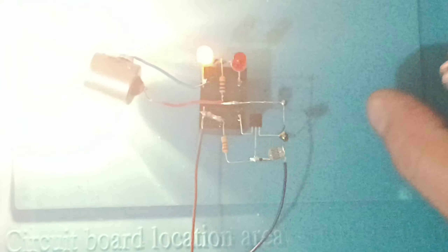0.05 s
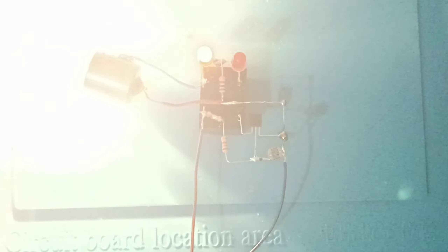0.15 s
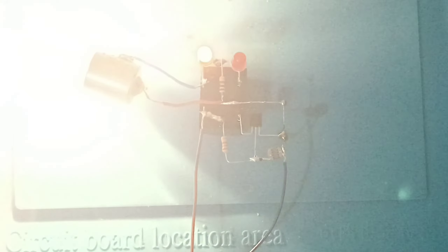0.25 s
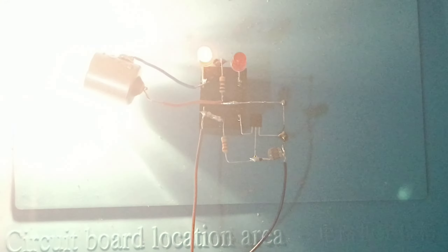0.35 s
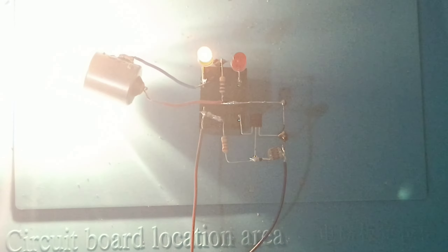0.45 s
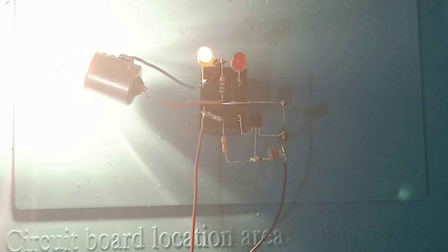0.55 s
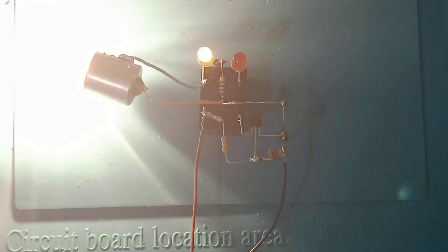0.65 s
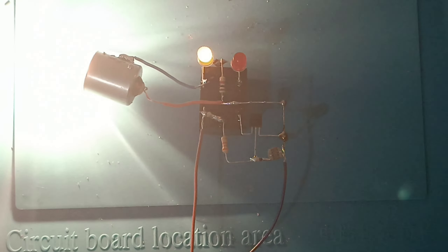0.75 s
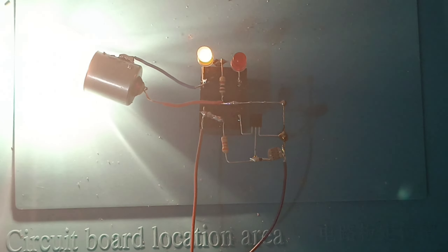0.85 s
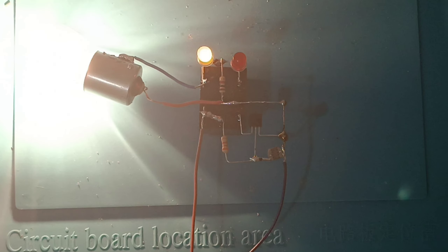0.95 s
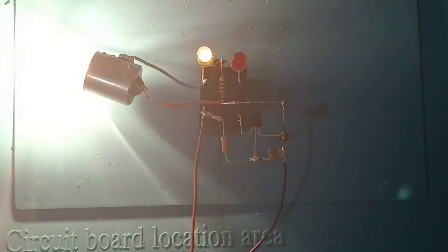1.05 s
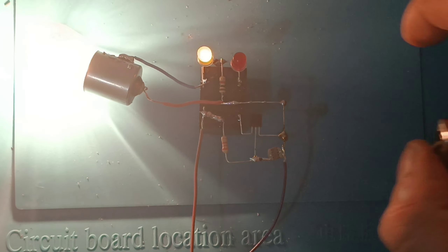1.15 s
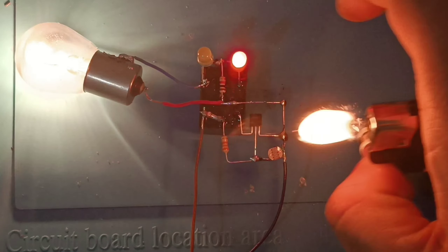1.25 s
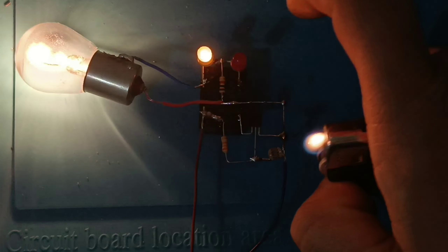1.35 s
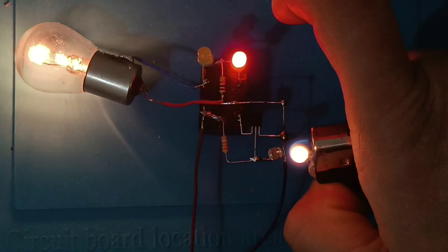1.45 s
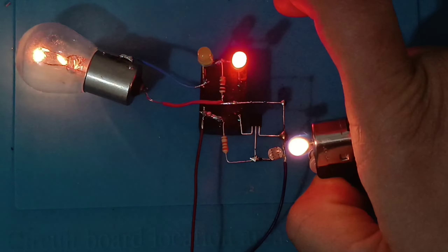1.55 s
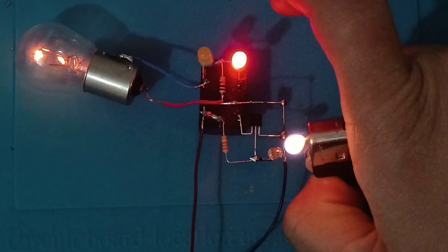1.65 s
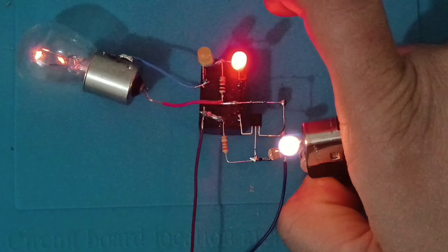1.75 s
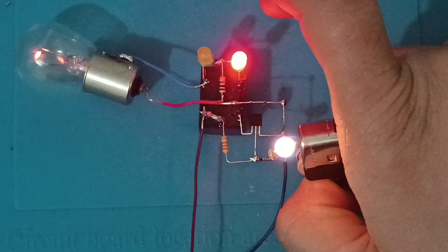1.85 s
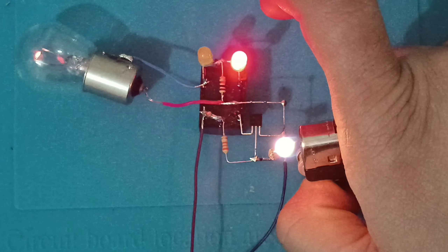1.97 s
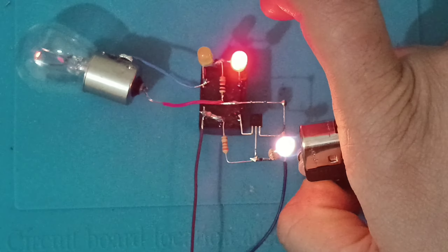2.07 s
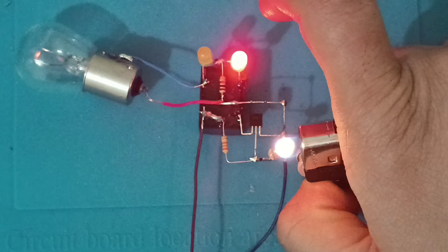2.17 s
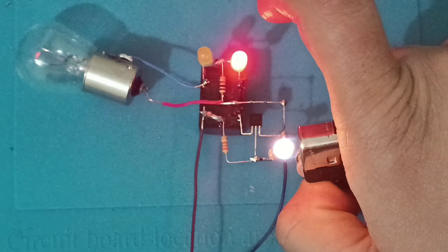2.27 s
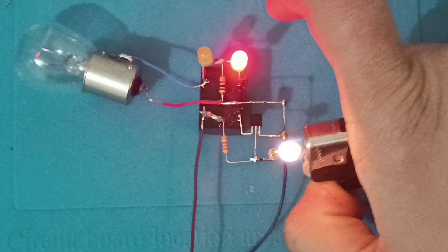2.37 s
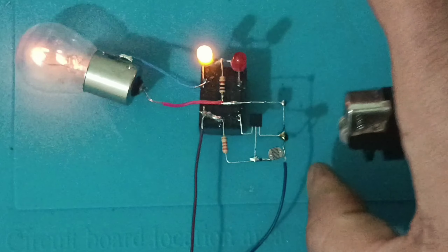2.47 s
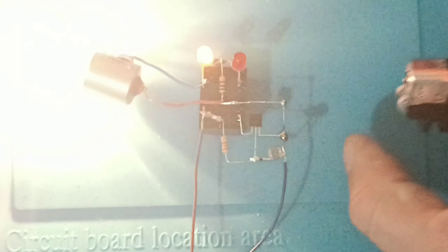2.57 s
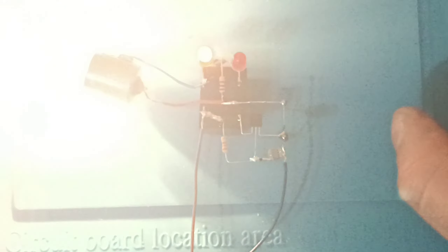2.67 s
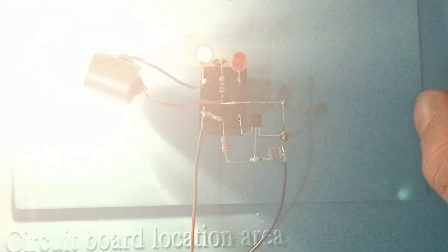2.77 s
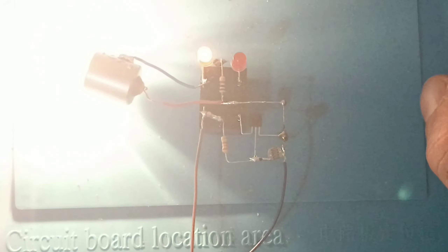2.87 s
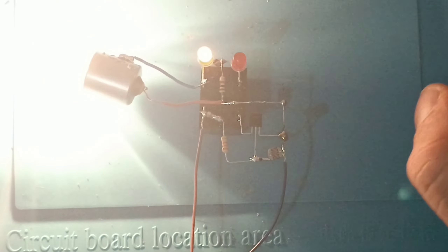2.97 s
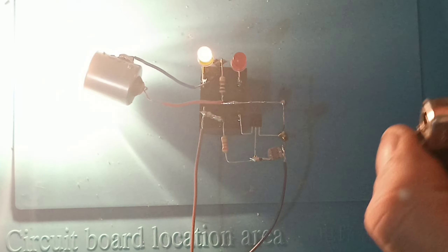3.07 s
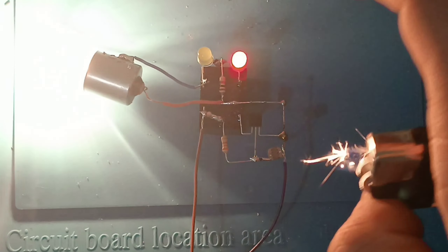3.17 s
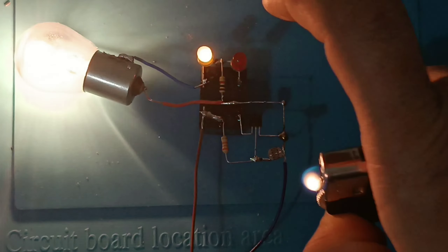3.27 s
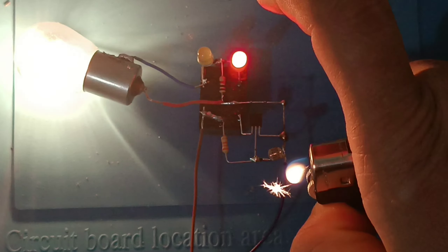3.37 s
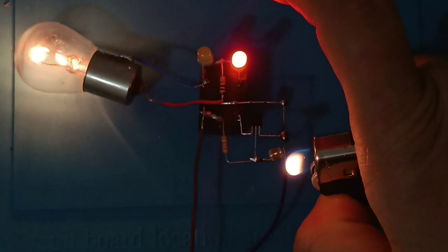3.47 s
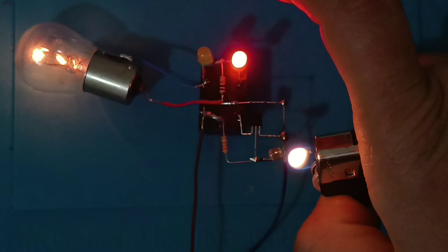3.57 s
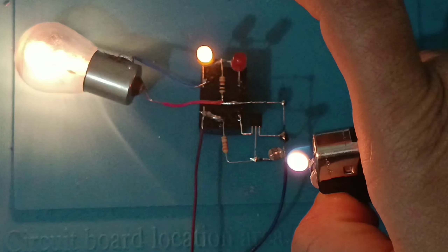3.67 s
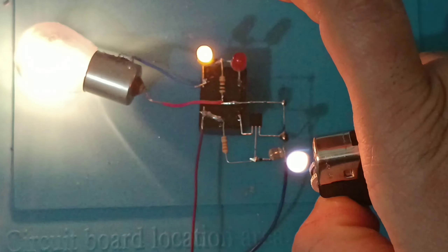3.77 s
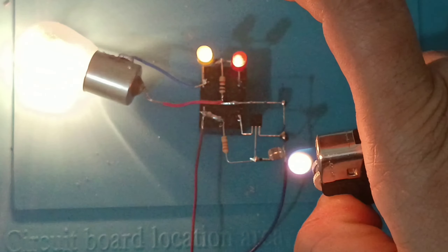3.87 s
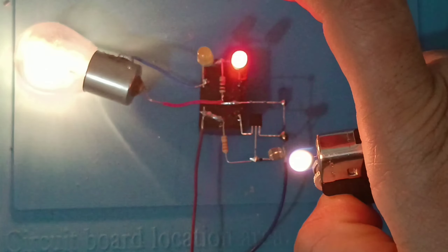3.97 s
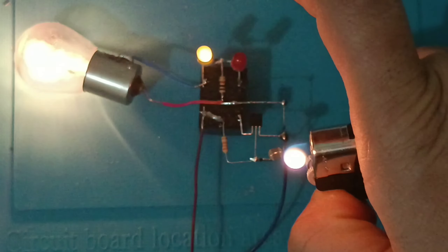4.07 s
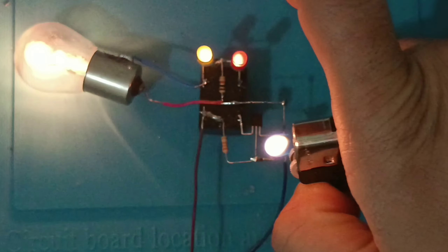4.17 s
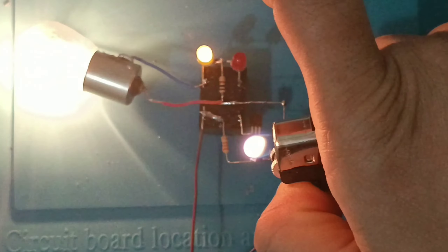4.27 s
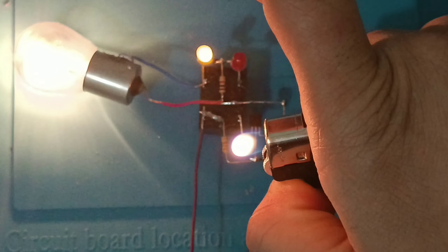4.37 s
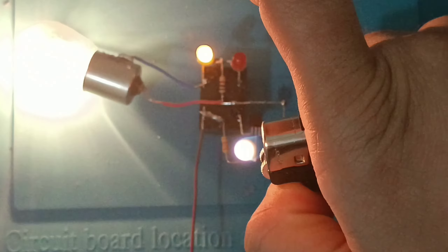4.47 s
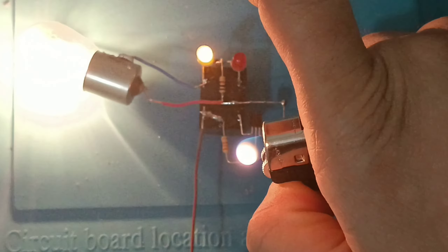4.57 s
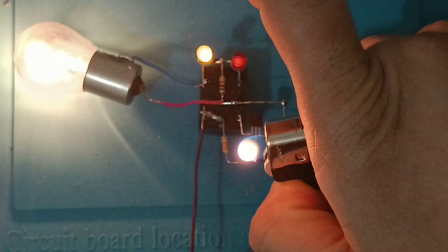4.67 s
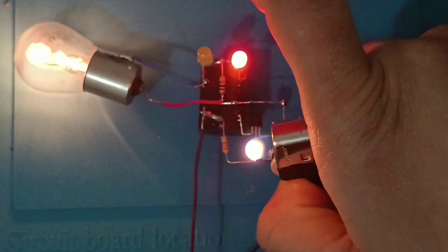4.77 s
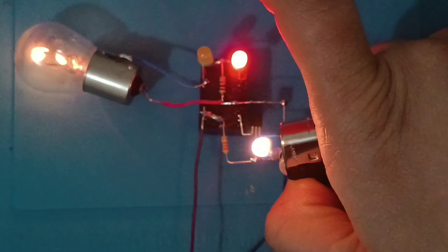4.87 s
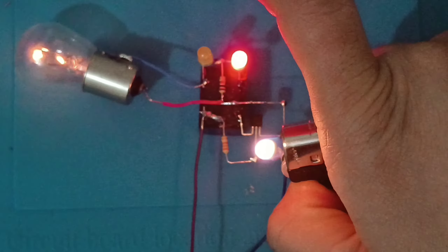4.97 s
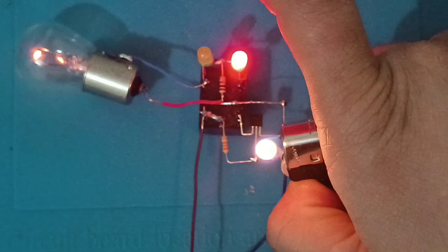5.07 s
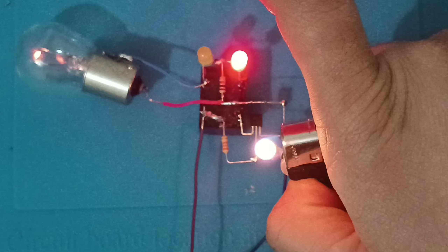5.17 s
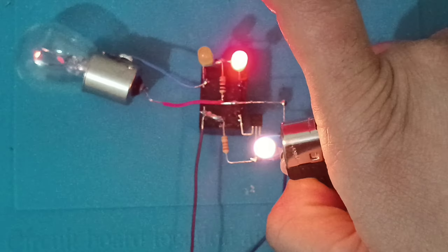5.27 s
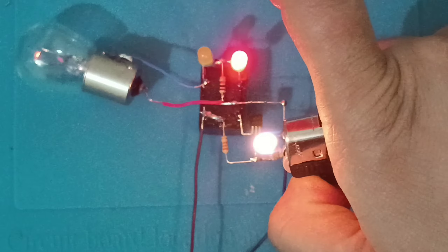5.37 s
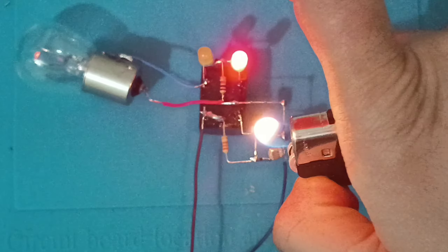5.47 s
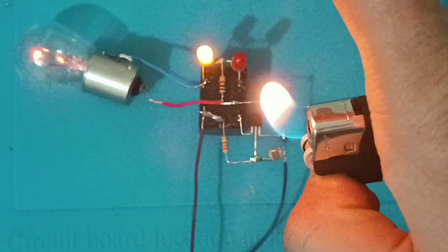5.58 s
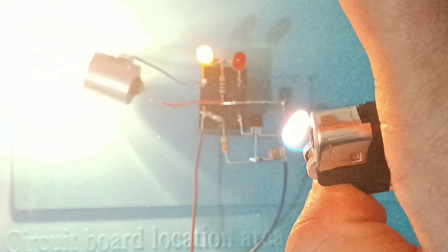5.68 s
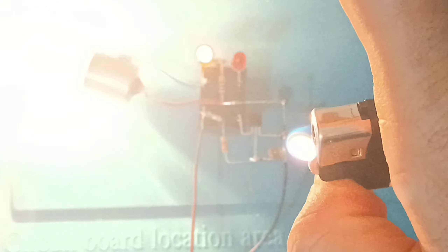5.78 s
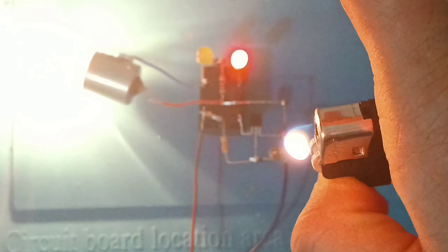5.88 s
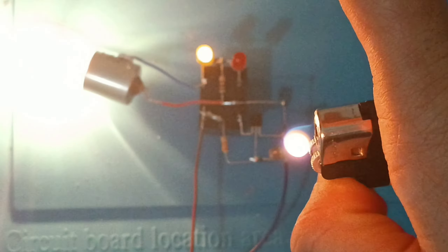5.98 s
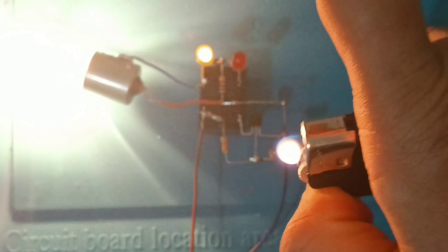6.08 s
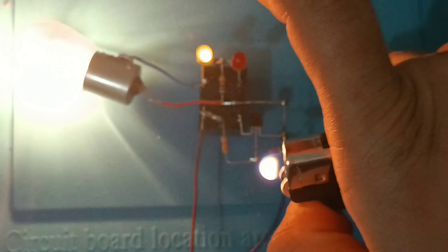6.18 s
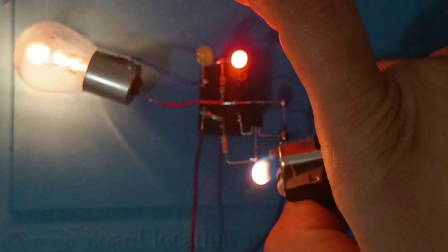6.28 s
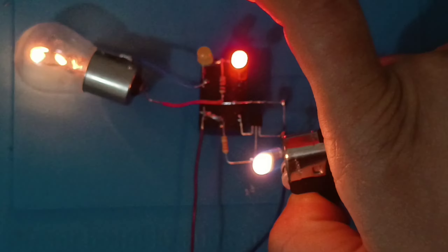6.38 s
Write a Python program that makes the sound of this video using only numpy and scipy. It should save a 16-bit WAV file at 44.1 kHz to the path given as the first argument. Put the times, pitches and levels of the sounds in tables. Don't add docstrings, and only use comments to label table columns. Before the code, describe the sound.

Very close on a hobby table in a small room: faint ticks, then a lighter strike, a sharp gritty rasp with a heavy lever thump, and a few small relay clicks. A second strike follows, lighter, then a firm relay snap and nearly a second of uneven rattling chatter. After a pause the relay closes again and chatters to the end. Soft hiss and low hand rumble lie underneath, picked up by a phone's stereo microphones.

```python
import sys
import numpy as np
from scipy import signal
from scipy.fft import rfft, irfft, next_fast_len
from scipy.io import wavfile
from scipy.ndimage import uniform_filter1d

SR = 44100
rng = np.random.default_rng(int(sys.argv[2]) if len(sys.argv) > 2 else 0)


def store_pcm(level_fs):
    pcm = np.round(np.clip(level_fs, -1, 1) * 32767).astype(np.int16)
    wavfile.write(sys.argv[1], SR, np.atleast_2d(pcm).T)


def nominal_scale(level):
    x = np.asarray(level, float) / 20
    return 10 ** x


N = 283563
T = np.arange(N) / SR

# (centre [Hz], width [Hz], level [dB])
TABLE_MODES = [(105, 30, -5), (139.4, 26, -3), (158.3, 3.9, 2.5), (185.3, 4, 5), (217.5, 11.6, 1.5),
               (297.3, 15, 0.5), (340, 7.2, -2), (374, 38, -6.5), (778, 107, -21.5)]


def unit(x):
    return x / np.sqrt(np.mean(x ** 2) + 1e-20)


def along(points, hz):
    f, v = np.transpose(points)
    return np.interp(np.log(hz + 1), np.log(f + 1), v)


def filtered(x, response):
    m = next_fast_len(N + SR // 2)
    return irfft(rfft(x, m) * response(np.fft.rfftfreq(m, 1 / SR)), m)[..., :N]


def modes(table, f, flip=-1):
    total = 0
    for k, (centre, width, db) in enumerate(table):
        damping = 1j * f * width
        total = total + flip ** k * nominal_scale(db) * damping / (centre * centre - f * f + damping)
    return total


def struck(x, gain):
    cep = irfft(np.log(gain(np.fft.rfftfreq(4096, 1 / SR)) + 1e-6))
    cep[1:2048] *= 2
    cep[2049:] = 0
    h = irfft(np.exp(rfft(cep)))
    return signal.fftconvolve(x, h / np.linalg.norm(h))[:N]


def treble(x, edge_hz):
    return filtered(x, lambda f: (1j * f / edge_hz) ** 2 / (1 + 1j * f / edge_hz) ** 2)


def stroke(s, db, hold, rise, fall):
    before = np.clip(s - T, 0, None)
    after = np.clip(T - s - hold, 0, None)
    return nominal_scale(db - rise * before - fall * after)


def grains(share, spread_db):
    sizes = nominal_scale(spread_db * rng.standard_normal(N))
    return unit(rng.standard_normal(N) * sizes * (rng.random(N) < share))


def spikes(s, size):
    return np.bincount(np.clip(np.round(s * SR).astype(int), 0, N - 1), size, N)


def space(x, near_s, room_db, direct_db):
    # (frequency [Hz], time to fall 60 dB [s])
    room_t60 = [(150, 0.64), (500, 0.75), (2000, 0.39), (8000, 0.29), (15000, 0.17)]
    lag = 6
    out, hop = np.zeros((2, N + SR)), SR // 3
    for k in range(0, N, hop):
        hz, t, z = signal.stft(rng.standard_normal((2, SR * 2 // 5)), SR, nperseg=256)
        decay = nominal_scale(-60 * t / along(room_t60, hz)[:, None])
        tail = signal.istft(z * decay, SR, nperseg=256)[1]
        near = rng.standard_normal(tail.shape) * nominal_scale(-60 * T[:tail.shape[1]] / near_s)
        near -= uniform_filter1d(near, size=40)
        h = near / np.linalg.norm(near[0]) + nominal_scale(room_db) * tail / np.linalg.norm(tail[0])
        h[[0, 1], [0, lag]] += nominal_scale(direct_db + np.array([2, -2]))
        wet = signal.fftconvolve(x[None, k:k + hop], h, axes=1)
        out[:, k:k + wet.shape[1]] += wet
    return out[:, :N]


def port_hiss():
    # (frequency [Hz], density [dB per Hz])
    air_colour = [(15, -54.5), (25, -24), (53, 2), (119, -1), (209, -5.5), (304, -10), (550, -15),
                  (780, -19.5), (1370, -19.5), (2610, -22), (6340, -36), (9500, -41), (13000, -40),
                  (15500, -35)]
    hiss = unit(filtered(rng.standard_normal((2, N)), lambda f: nominal_scale(along(air_colour, f))))
    return nominal_scale(-60.5) * hiss * nominal_scale([[.6], [-.6]])


def far_ring():
    # (time [s], level [dB], rise [dB per s], fall [dB per s])
    swell = (2.67, -71, 200, 17)
    s, db, rise, fall = swell
    return np.sin(2 * np.pi * 588 * T) * stroke(s, db, 0, rise, fall)


def hand_on_table():
    # (time [s], level [dB], hold [s])
    presses = [
        (0, -60.5, .01),
        (0.435, -60.5, 0.15),
        (1.36, -46.5, 0.13),
        (2.74, -66.5, .01),
        (3.42, -51, .01),
        (3.898, -55.5, 0.82),
        (5.88, -67, .05),
        (6.16, -59.5, .3),
    ]
    # (time [s], level [dB], half length [s], pitch [Hz])
    shifts = [
        (0.12, -60, 0.033, 105),
        (0.586, -55.5, 0.056, 110),
        (2.6, -59, 0.043, 120),
        (3.508, -63, 0.09, 98),
        (3.751, -54.5, 0.059, 157),
        (4.31, -63.5, 0.14, 120),
        (4.845, -54.5, 0.091, 132),
        (5.741, -58.5, 0.062, 244),
        (3.324, -48.5, 0.054, 112),
        (6.42, -56, 0.034, 120),
    ]
    rest_db, rise, fall = -77, 120, 75
    lumps = nominal_scale(3.5 * unit(uniform_filter1d(rng.standard_normal(N), 1500)))
    press = nominal_scale(rest_db) + sum(stroke(*row, rise, fall) for row in presses)
    rumble = filtered(rng.standard_normal(N), lambda f: modes(TABLE_MODES, f))
    hand = nominal_scale(-5.0) * press * unit(lumps * rumble)
    for s, db, half, hz in shifts:
        groan = unit(filtered(rng.standard_normal(N), lambda f: modes([(hz, 45, 0)], f) ** 2))
        hand += nominal_scale(db) * np.exp(-((T - s) / half) ** 2) * groan
    return hand


def sleeve():
    # (time [s], level [dB])
    brushes = [
        (.42, -74),
        (.57, -66.5),
        (1.06, -64.5),
        (2.72, -70),
    ]
    # (frequency [Hz], density [dB per Hz])
    skin_colour = [(300, -24.5), (800, -2.5), (1800, 5), (3000, -9), (5500, -9), (9000, -16.5),
                   (15000, -27)]
    swell = sum(stroke(s, db, 0, 430, 130) for s, db in brushes)
    return swell * unit(filtered(rng.standard_normal((2, N)), lambda f: nominal_scale(along(skin_colour, f))))


def background():
    return port_hiss() + hand_on_table() + sleeve() + far_ring()


def flint_wheel(bites):
    # (frequency [Hz], density [dB per Hz])
    wheel_colour = [(350, -30), (600, -8.5), (1220, -15.5), (2460, -2.5), (2780, -3), (3190, -2),
                    (4200, -6), (5640, -6.5), (6640, -13), (15400, -14.5)]
    bite, spin_out = 0, 0
    for s, db, tooth, spin in bites:
        for late, under_db in ((0, 0), (tooth, -3.5)):
            bite = bite + stroke(s + late, db + under_db, 0, 2630, 2400)
        spin_out = spin_out + stroke(s, db - 11.5, tooth, 960, 180) * (T < s + spin)
    grit = nominal_scale(-3) * grains(.3, 4.7) * (bite + spin_out)
    return struck(grit, lambda f: nominal_scale(along(wheel_colour, f)))


def lever_slide():
    # (time [s], level [dB], hold [s])
    slides = [
        (0, -62, 0.028),
        (2.499, -56, 0.023),
    ]
    # (centre [Hz], width [Hz], level [dB])
    lever_modes = [(1560, 710, -13), (3230, 195, 0.5), (4370, 660, -14.5), (10000, 3000, -27)]
    squeak = unit(filtered(grains(.1, 3), lambda f: modes(lever_modes, f)))
    return squeak * sum(stroke(*row, 4500, 1500) for row in slides)


def lighter_ticks():
    # (time [s], peak [dB], ring [Hz], crack [dB])
    knocks = [
        (.0078, -39.5, 3200, -16),
        (.026, -40, 3420, -14),
        (1.3241, -17, 3470, -1),
        (1.333, -28, 3560, 0),
        (3.2597, -20, 3480, -0.5),
        (3.272, -30.5, 3350, -2),
        (3.2955, -32, 2650, 4),
    ]
    t = T[:SR // 20]
    ticks = np.zeros(N + SR)
    for s, db, hz, crack_db in knocks:
        ring = np.sin(2 * np.pi * hz * t) * nominal_scale(-60 * t / 0.011)
        crack = rng.standard_normal(len(t)) * nominal_scale(crack_db - 60 * t / 0.0027)
        ticks[round(s * SR):][:len(t)] += nominal_scale(db) * (ring + crack)
    return ticks[:N]


def lever_thumps():
    # (time [s], level [dB], push [Hz])
    pushes = [
        (1.3573, -18.5, 238),
        (1.362, -21, 174),
        (3.286, -31, 265),
        (3.2894, -36, 330),
        (3.2924, -26.5, 257),
        (3.297, -37, 220),
    ]
    t = T[:SR // 20]
    thumps = np.zeros(N + SR)
    for s, db, hz in pushes:
        push = np.sin(2 * np.pi * hz * t) + .14 * np.sin(6 * np.pi * hz * t)
        one_cycle = (t * hz < 1) * np.sin(np.pi * hz * t)
        thumps[round(s * SR):][:len(t)] -= nominal_scale(db) * push * one_cycle
    thumps = thumps[:N]
    boom = lambda f: modes(TABLE_MODES, f) * np.exp(-2j * np.pi * f * 0.01508)
    return thumps + nominal_scale(-0.5) * filtered(thumps, boom)


def body_jolt(bites):
    jolt = 0
    for s, db, *_ in bites:
        jolt = jolt + np.sin(2 * np.pi * 317 * (T - s)) * stroke(s, db - 2.5, 0, 6200, 6200)
    return jolt


def lighter():
    # (time [s], level [dB], next tooth after [s], spin-out [s])
    bites = [
        (1.3248, -28.5, 0.0089, .046),
        (3.2605, -30, .012, .039),
    ]
    air = lever_slide() + flint_wheel(bites) + nominal_scale(-6) * lighter_ticks()
    return space(air, 0.0053, -3, 3.85), body_jolt(bites) + lever_thumps()


def taps(bursts, span, rate, scatter, spread_db, fade_db):
    s, db, bright_db, shake_db = np.transpose(bursts)[:, :, None]
    span = np.reshape(span, (-1, 1))
    chance = rng.standard_normal((len(bursts), 48, 2))
    late = np.cumsum(np.exp(scatter * chance[..., 0]), axis=1) / rate
    late -= late[:, :1]
    chance[:, 0, 1] = 0.58
    alive = 1 / (1 + np.exp(np.clip((late - span) / .0012, -30, 30)))
    size = alive * nominal_scale(db + spread_db * chance[..., 1] - fade_db * late / span)
    when = (s + late).ravel()
    return np.array([spikes(when, (size * nominal_scale(g)).ravel()) for g in (0, bright_db, shake_db)])


def armature():
    # (time [s], peak [dB], bright part [dB], table shake [dB])
    snaps = [(.0468, -45.5, -5, -16), (.0508, -46, 3, -6), (.0572, -34, -8.5, -12.5), (.0665, -54, -18, 0),
             (1.3938, -32.5, -16, -24), (1.4512, -42, -5, -27), (1.498, -52, -12, -21),
             (1.5034, -44, -18, -7), (1.595, -55.5, -16, -16), (2.5403, -48, -4, -5),
             (2.5443, -41.5, -5, -10), (2.5515, -34.5, -12, -12), (2.561, -51, -10, -14),
             (3.354, -44, -5, -32), (3.3607, -31.5, -6, -32), (5.7235, -34, -16, -14)]
    # (time [s], peak [dB], bright part [dB], table shake [dB])
    closings = [
        (3.45, -24.5, -21, -17.5),
        (5.6772, -44, -38, -22.5),
        (5.6767, -37.5, -28, -7.5),
        (5.9712, -27, -26, -14.5),
    ]
    # (time [s], peak [dB], bright part [dB], length [s])
    chatter = [(3.6845, -38.5, -10, .085), (3.806, -40, -14.5, .011), (3.8637, -39.5, -12.5, 0.0093),
               (3.948, -41, -10.5, 0.013), (3.984, -38.5, -17, 0.015), (4.024, -38.5, -10.5, 0.01),
               (4.05, -48.5, -11, 0.022), (4.1104, -42.5, -12, 0.033), (4.1558, -38, -15, 0.018),
               (4.1787, -48, -12, 0.049), (4.277, -43.5, -12, 0.095), (4.387, -39.5, -17, 0.02),
               (4.444, -43.5, -12, 0.061), (4.4985, -40.5, -16, 0.059), (4.587, -50.5, -12, 0.031),
               (4.625, -43, -14, 0.067), (4.7003, -42, -17, .11), (4.8008, -40.5, -22, 0.074),
               (5.687, -35, -28, .021), (5.9974, -51, -22, 0.061), (6.0214, -37, -11, .0098),
               (6.0668, -56, 4.5, 0.017), (6.084, -42, -9, 0.028), (6.1405, -43.5, -8.5, 0.052),
               (6.2135, -43, -8, 0.093), (6.2986, -43.5, -7.5, .061), (6.365, -41.5, -19, 0.013)]
    shake_db = -51.5
    rows = [(s, db, bright_db, shake_db - db) for s, db, bright_db, span in chatter]
    spans = [row[-1] for row in chatter]
    single = nominal_scale(11) * taps(snaps, 0.00093, 900, .3, 3.4, 12)
    bouncing = nominal_scale(8) * taps(closings, 0.0091, 900, .5, 2.5, 8.4)
    return single + bouncing + nominal_scale(7.5) * taps(rows, spans, 290, .3, 2.9, 0.56)


def relay():
    # (frequency [Hz], density [dB per Hz])
    case_colour = [(410, -25), (700, -16.5), (997, -8), (1800, -17.5), (2430, -4), (3280, -4.5),
                   (4100, -5.5), (5190, -5.5), (5540, -3.5), (7290, -6.5), (8530, -9.5), (9860, -1.5),
                   (11700, -13), (14300, 0), (16000, -11)]
    # (centre [Hz], width [Hz], level [dB])
    spring_modes = [(2410, 430, 7.5), (2900, 370, 7), (3240, 360, 5.5), (5662, 76, 9.5), (6270, 94, 5),
                    (7380, 226, 4.5)]
    # (centre [Hz], width [Hz], level of the part taken away [dB])
    hollow_bands = [(4270, 730, -4.5), (8450, 1480, -2)]

    def colour(f):
        springs = 1 + np.abs(modes(spring_modes, f))
        hollows = np.abs(1 - 0.64 * modes(hollow_bands, f, flip=0.73))
        return nominal_scale(along(case_colour, f)) * springs * hollows

    plain, bright, shake = armature()
    body = struck(plain - treble(plain, 6000), colour)
    tick = nominal_scale(14.5) * struck(treble(bright, 9400), colour)
    air = space(body, 0.042, -0.82, -4) + space(tick, 0.005, 0.56, 2.5)
    return air, nominal_scale(28) * filtered(shake, lambda f: modes(TABLE_MODES, f))


def scene():
    # (frequency [Hz], left minus right [dB])
    port_balance = [(200, -11.5), (2000, 0), (6500, -4.5), (8500, -2), (10000, 7.5), (11000, 19.5),
                    (11500, 17.5), (12000, 13), (12700, 21), (13500, 14), (14200, 13.5), (15500, 9.5)]

    def ports(f):
        no_bass = f ** 2 / (f ** 2 + 300 ** 2)
        return no_bass * nominal_scale(along(port_balance, f) * np.array([[.3], [-.7]]))

    behind = background()
    spark, thump = lighter()
    click, shake = relay()
    air = filtered(click + spark, ports)
    low = shake + thump
    sway = filtered(low, lambda f: modes([(120, 48, -14.5), (330, 116, -11.5)], f))
    return air + low + sway * [[1], [-1]] + behind


def top_cut(x):
    return signal.sosfilt(signal.butter(12, 16630, fs=SR, output="sos"), x)


def record(dry):
    bass = lambda f: ((1j * f / 50) / (1 + 1j * f / 50)) ** 2
    top = lambda f: nominal_scale(-30 * np.clip((f - 15450) / 250, 0, 1) - 60 * (f > 16500))
    return top_cut(filtered(dry, lambda f: bass(f) * top(f)))


dry = scene()
out = record(dry)
store_pcm(out)
```